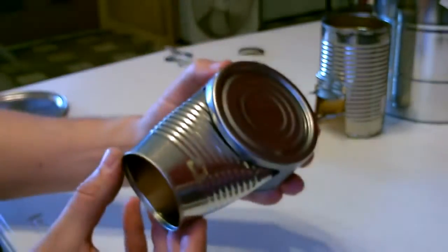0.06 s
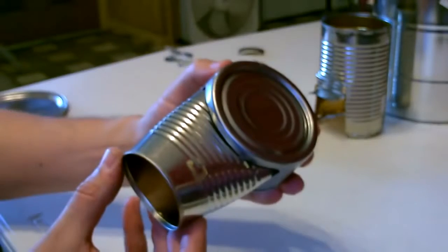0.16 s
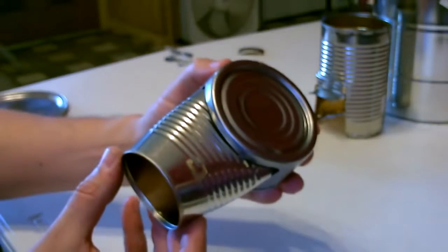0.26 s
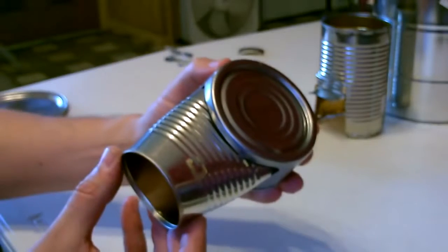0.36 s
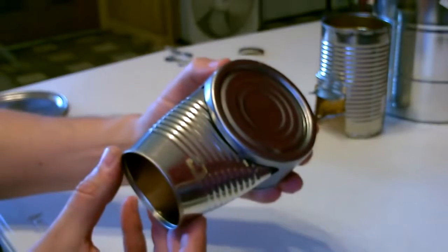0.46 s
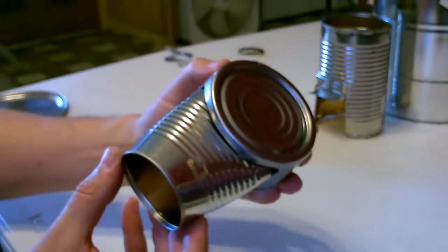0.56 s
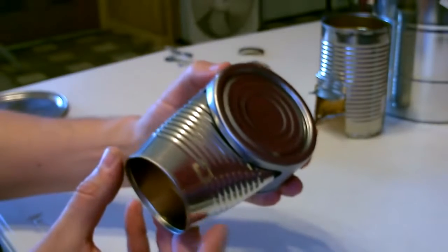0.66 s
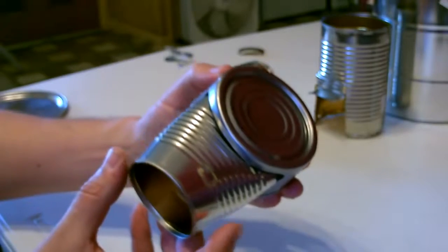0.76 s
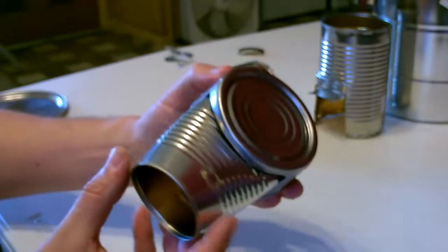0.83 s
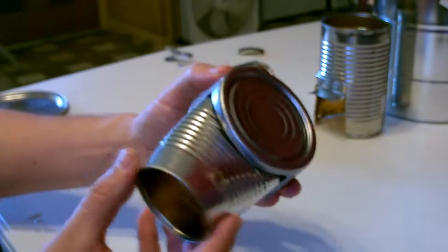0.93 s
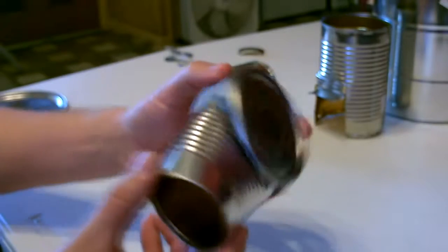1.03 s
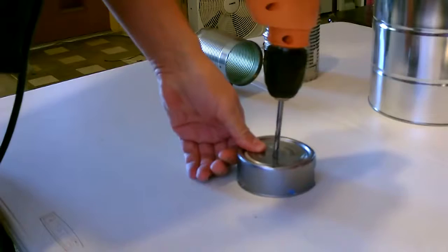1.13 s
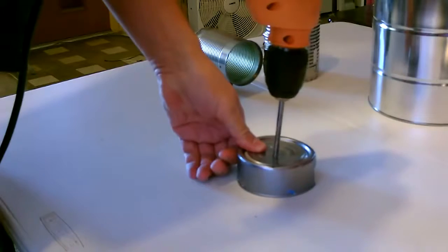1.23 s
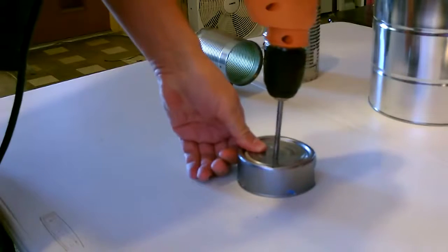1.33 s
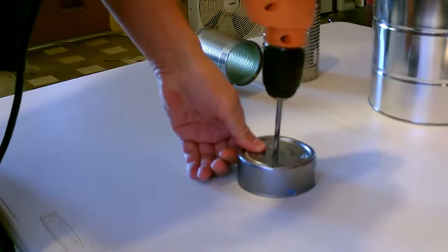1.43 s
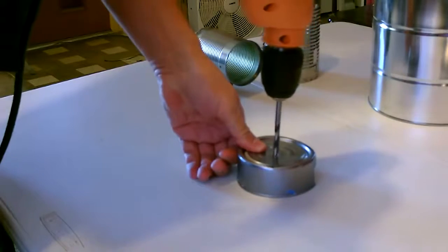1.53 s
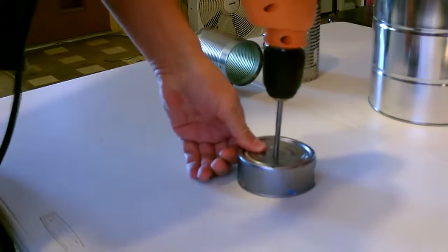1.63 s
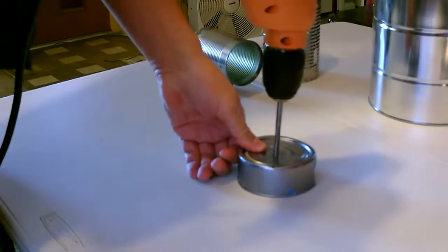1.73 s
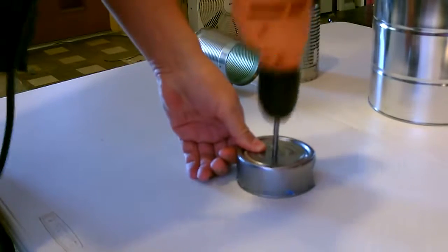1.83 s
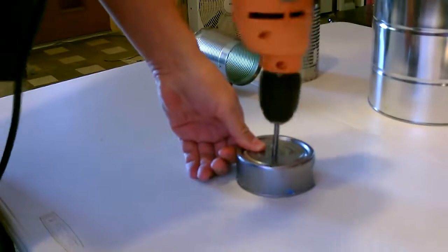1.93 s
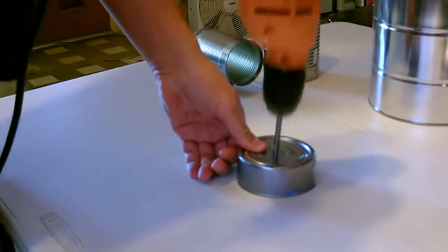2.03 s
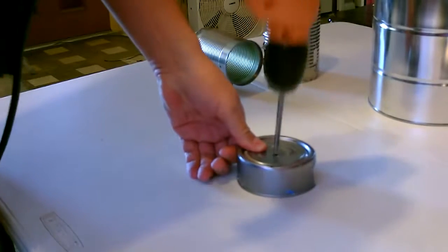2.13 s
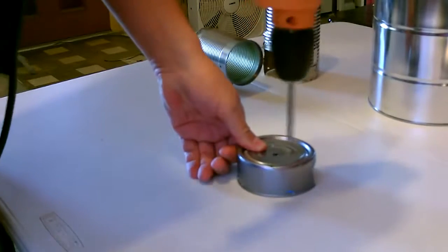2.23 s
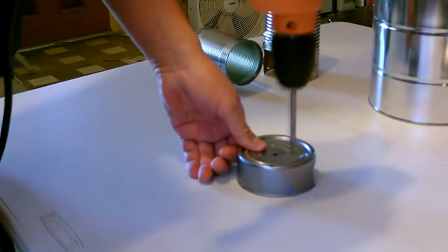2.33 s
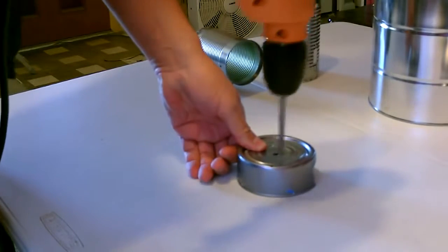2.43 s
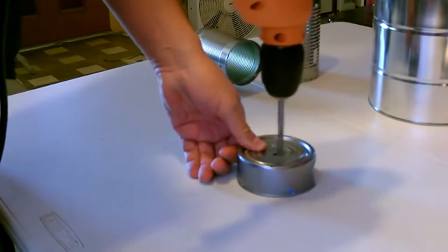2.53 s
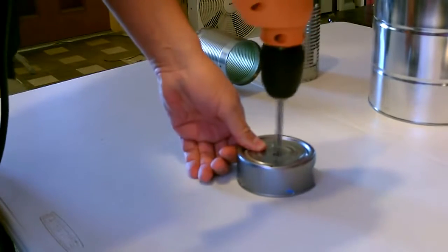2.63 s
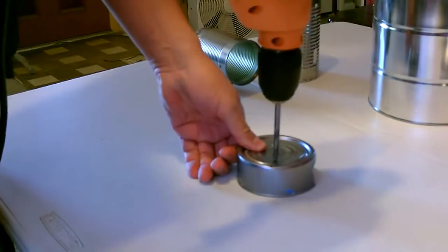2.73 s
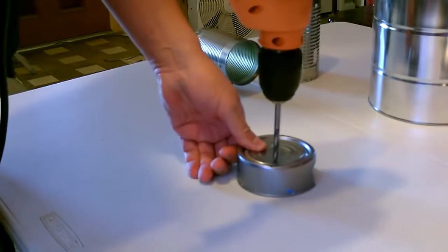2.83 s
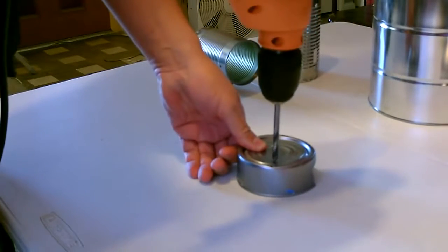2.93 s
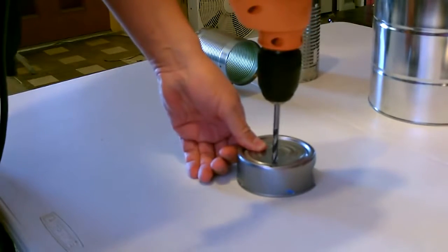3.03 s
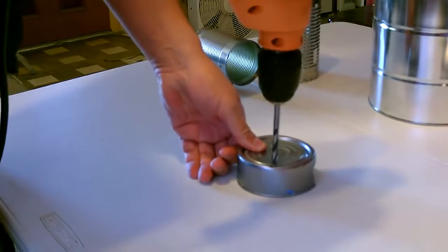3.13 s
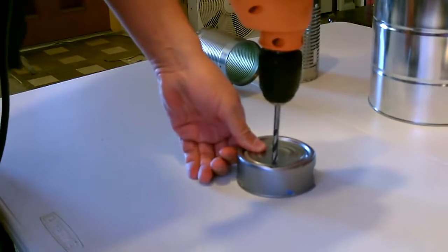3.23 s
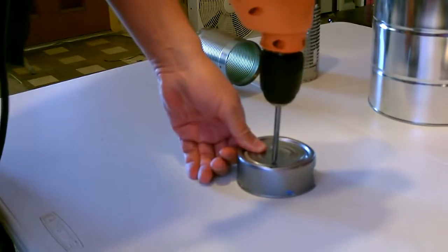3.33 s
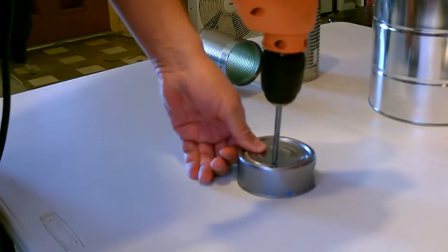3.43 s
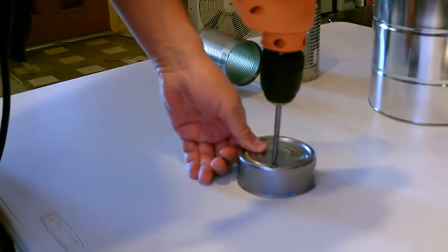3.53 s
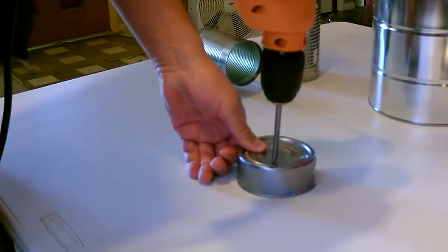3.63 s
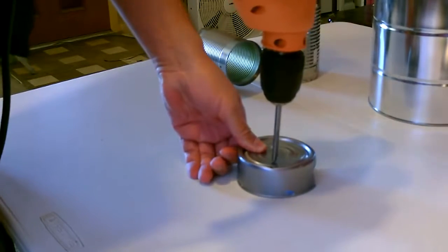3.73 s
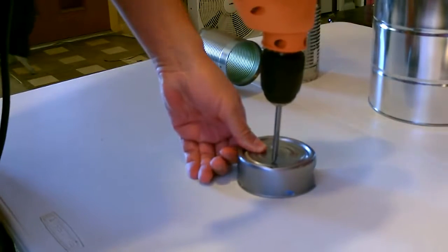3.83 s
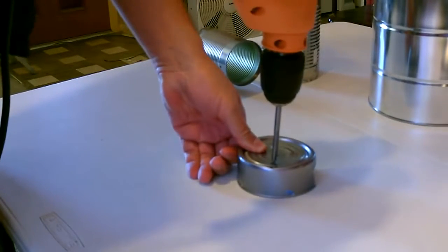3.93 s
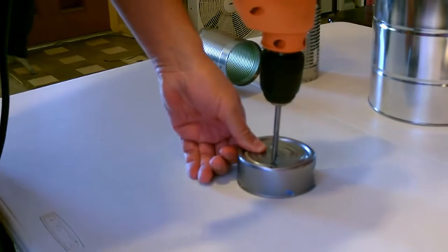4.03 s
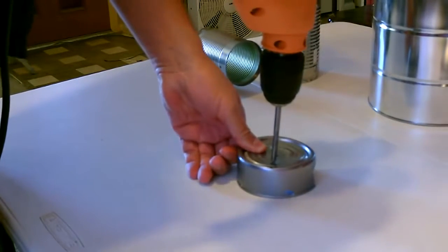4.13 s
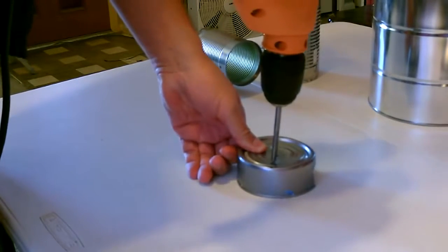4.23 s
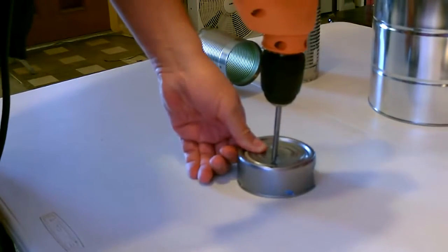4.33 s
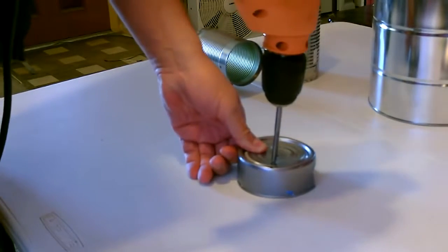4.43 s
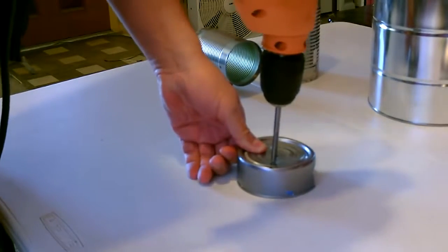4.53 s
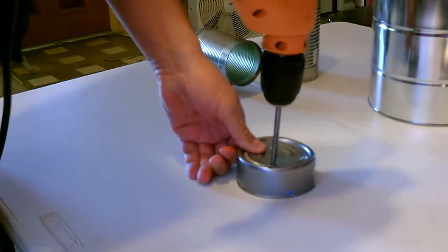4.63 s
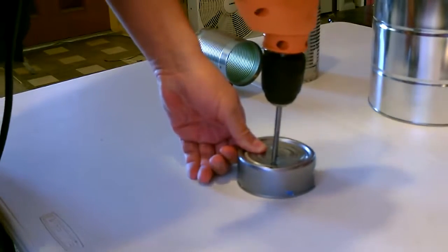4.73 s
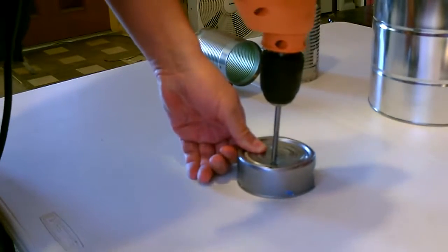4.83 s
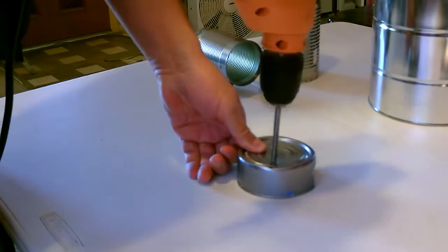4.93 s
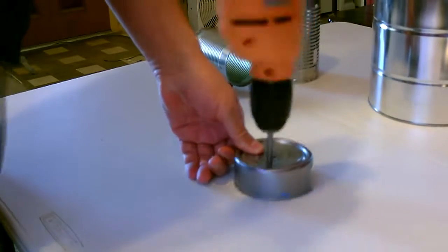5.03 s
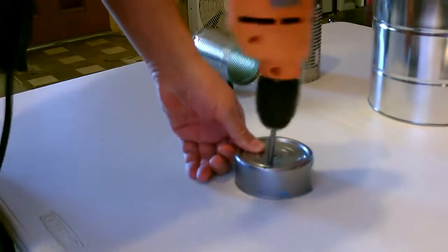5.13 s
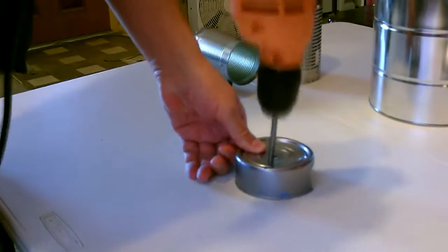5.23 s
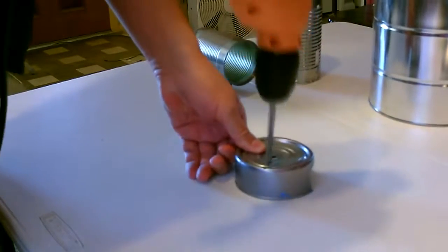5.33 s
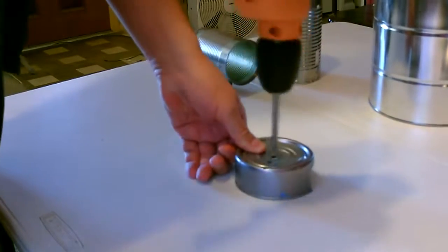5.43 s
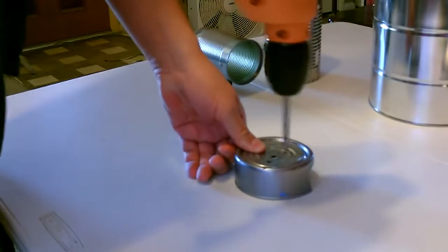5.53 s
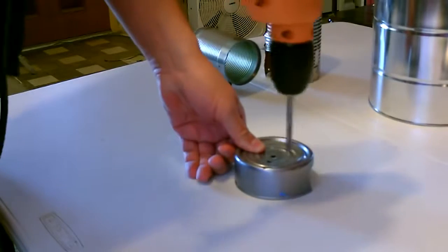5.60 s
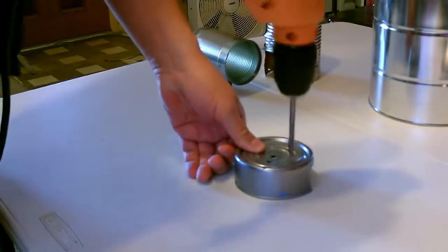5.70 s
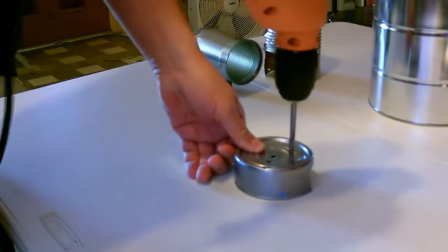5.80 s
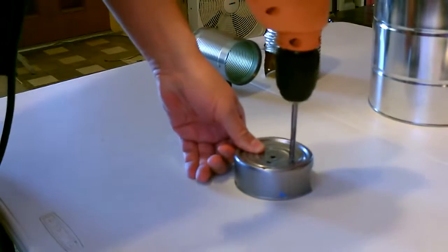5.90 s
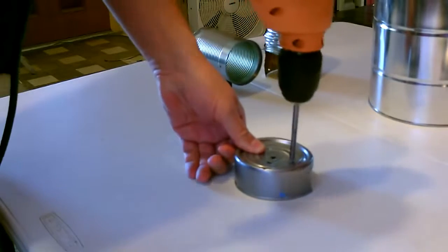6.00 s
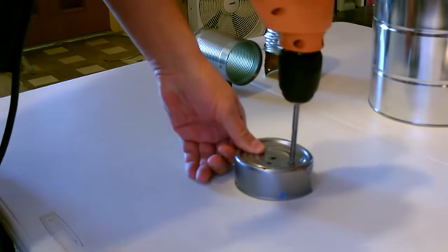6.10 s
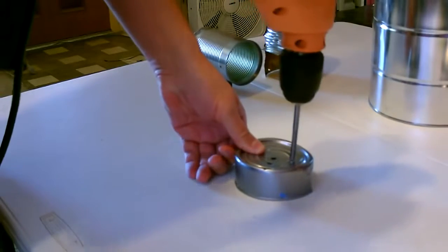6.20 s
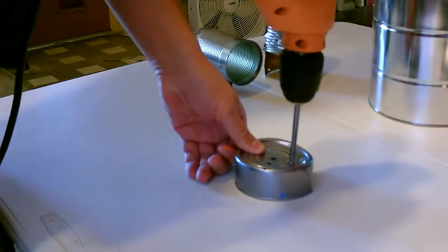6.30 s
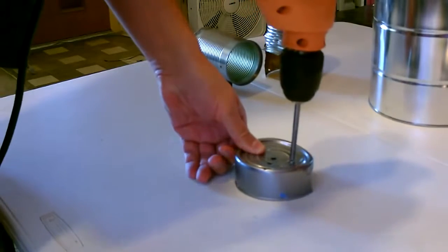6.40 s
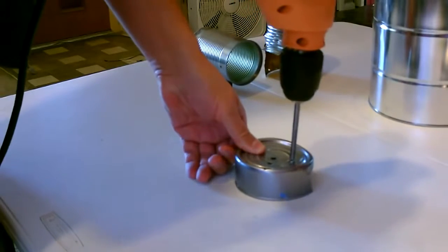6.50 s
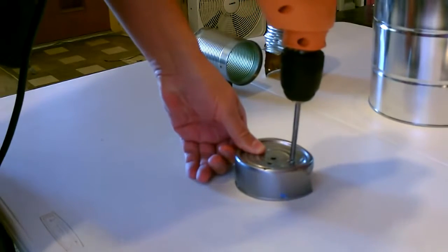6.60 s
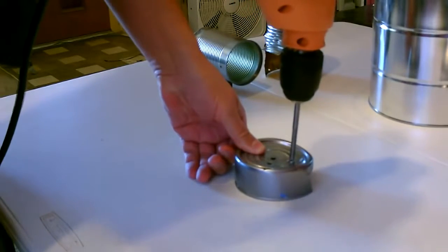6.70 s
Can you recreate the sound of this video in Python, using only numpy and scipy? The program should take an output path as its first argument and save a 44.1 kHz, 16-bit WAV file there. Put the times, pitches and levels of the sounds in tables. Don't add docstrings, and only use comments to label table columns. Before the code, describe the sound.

A mains drill works on a small tin can on a table, heard close in a lightly echoing room with a soft fan behind. Clicks of the trigger precede rough, throbbing bursts; short squeals rise as the motor speeds up. The bit catches, making the can drum and the lid sing with metallic clanks and low table thumps. Between bursts the whine sinks with rattling ticks, and the last burst is still grinding at the end.

```python
import sys
import numpy as np
from scipy import signal
from scipy.fft import rfft, irfft, next_fast_len
from scipy.io import wavfile
from scipy.ndimage import uniform_filter1d

SR = 44100
rng = np.random.default_rng(int(sys.argv[2]) if len(sys.argv) > 2 else 0)


def voltage_ratio(decibels):
    exponent = np.asarray(decibels, float) / 20
    return 10 ** exponent


def persist_wave(psi):
    counts = np.round(np.clip(psi, -1, 1) * 32767).astype(np.int16)
    wavfile.write(sys.argv[1], SR, np.atleast_2d(counts).T)


N = 298116
TIME = np.arange(N) / SR
MAINS_THROB_HZ = 122.1
HUM_HZ = 243
FIRST_PULL_S = 1.2755

# [f/Hz, width/Hz, level/dB]
HOUSING = [
    (2665, 130, 0),
    (2900, 320, -6),
    (3700, 260, -5),
    (4150, 350, -10),
]
# [f/Hz, width/Hz, level/dB]
GEARBOX = [
    (1790, 120, 0),
    (2100, 240, -3),
]
# [f/Hz, width/Hz, level/dB]
LID = [
    (964, 163, -0.5),
    (1256, 910, -1.5),
    (1520, 407, 1.5),
    (1650, 46, -8.5),
]
# [t/s, level/dB]
LOAD = [
    [(1.276, -37), (1.308, -41), (1.325, -32), (1.366, -29), (1.568, -35.5), (1.644, -43.5), (1.656, -39),
     (1.735, -56)],
    [(1.757, -45), (1.785, -28), (1.817, -28), (1.839, -26), (2.285, -36.5), (2.3, -59)],
    [(3.44, -62), (3.518, -35), (4.174, -43), (4.44, -35.5), (4.742, -38), (4.8, -36)],
    [(4.8, -36.5), (4.874, -31), (5.228, -26.5), (5.244, -34), (5.262, -30), (5.48, -29.5)],
    [(6.0, -52.5), (6.292, -37.5), (6.306, -44), (6.376, -30.5), (6.646, -33), (6.76, -33)],
    [(2.32, -42.5), (2.6, -54.5), (3.3, -67.5)],
    [(5.51, -40), (5.58, -58.5), (5.95, -65.5)],
]


def rms_one(x):
    return x / np.sqrt(np.mean(x ** 2) + 1e-20)


def in_time(rows):
    s, *columns = np.transpose(rows)
    return [np.interp(TIME, s, column) for column in columns]


def control(tables):
    return in_time(sorted(sum(tables, [])))[0]


def gate(start_s, end_s, fade_s):
    return np.clip(np.minimum(TIME - start_s, end_s - TIME) / fade_s, 0, 1)


def drift(rate):
    r = np.exp(-80 * np.pi * rate / SR)
    noise = rng.standard_normal(N // 40 + 2002)
    slow = signal.lfilter([1], [1, -2 * r, r * r], noise)[2000:]
    return np.interp(np.arange(N) / 40, np.arange(len(slow)), rms_one(slow))


def coloured(x, spectrum):
    hz, db = np.transpose(spectrum)
    grid = np.maximum(np.arange(N // 2 + 1) * SR / N, 1)
    return rms_one(irfft(rfft(x) * voltage_ratio(np.interp(np.log(grid), np.log(hz), db)), N))


def resonate(x, modes, sway_db=0):
    out = 0
    for k, (hz, width, db) in enumerate(modes):
        r = np.exp(-np.pi * width / SR)
        a = [1, -2 * r * np.cos(2 * np.pi * hz / SR), r * r]
        gain = voltage_ratio(db + sway_db * drift(17.7)) if sway_db else voltage_ratio(db)
        out = out + (-1) ** k * gain * signal.lfilter([(1 - r * r) / 2, 0, (r * r - 1) / 2], a, x)
    return rms_one(out)


def grit(per_s, spread_db, smooth):
    sizes = voltage_ratio(spread_db * np.minimum(rng.exponential(1, N), 4)) * rng.choice([-1, 1], N)
    contacts = sizes * (rng.random(N) < per_s / SR)
    return rms_one(contacts) + smooth * rng.standard_normal(N)


def add_ring(out, s, db, hz, t60, rise_s):
    start = round(s * SR)
    t = np.arange(min(4000, N - start)) / SR
    envelope = voltage_ratio(db - 60 * t / t60) * (1 - np.exp(-t / rise_s))
    out[start:][:len(t)] += envelope * np.sin(2 * np.pi * hz * t)


def cracks(events):
    spikes = np.zeros(N)
    for s, db in events:
        spikes[round(s * SR)] = voltage_ratio(db)
    envelope = signal.lfilter([1], [1, -voltage_ratio(-60 / (0.012 * SR))], spikes + 1e-18)
    spectrum = [(500, -47.0), (1200, -14), (3500, -0.5), (9000, -5.0), (16000, 1.5)]
    return envelope * coloured(rng.standard_normal(N), spectrum)


def throb(depth, sharp):
    firing_jitter_s = .0012
    t = TIME + 0.0017 + firing_jitter_s * drift(54)
    half_wave = np.abs(np.sin(np.pi * MAINS_THROB_HZ * t)) ** sharp
    depth = np.clip(depth, 0, 1)
    return 1 - depth + depth * rms_one(half_wave)


def phases():
    # [start t/s, throb depth 0-1, gearbox growl/dB, housing whirr/dB, lid ring/dB]
    work = [(1.2, 0.1, -2, -6, 2.5), (1.32, 0.1, 5.5, -1, 5), (1.58, 0, 6, -3, -4.5), (1.74, 0.27, 9, 2, 5),
            (1.91, 0.16, 10, 4, 9.5), (2.201, 0, -1, 7, 14.5), (2.295, 0.1, 5.5, -8, 6), (3.4, 1, 6, -1, 2),
            (3.79, 1, 7.5, -2.5, -2), (4.1, 0.3, 11, 3.5, -12), (4.3, 0.9, 1, 1, 0.5),
            (4.808, 0.8, -17, -2.5, 1), (4.91, .05, -1, -3, 9), (5.127, 0.3, 8.5, 3, 5.5),
            (5.51, 0, 7, -5, 13), (5.97, 1, 5, 0, -12), (6.352, 0.8, -6, 0, 2), (6.46, 0.7, 6, -8, 7)]
    start_s, *settings = np.transpose(work)
    current = np.maximum(np.searchsorted(start_s, TIME) - 1, 0)
    blend_s = .03
    return uniform_filter1d(np.array(settings)[:, current], size=round(blend_s * SR), axis=-1)


def fan():
    # [f/Hz, level/dB per Hz]
    air = [(18, -61), (40, -53.5), (102, -29.5), (177, -16), (266, -13), (300, -10), (497, -1.5),
           (574, -3.5), (632, -2.5), (1100, -16.5), (1430, -17), (2540, -27.5), (9290, -35), (13600, -38.5),
           (20400, -120)]
    hum = gate(1.15, np.inf, .05) * voltage_ratio(-61.5 + 2 * drift(12)) * np.sin(2 * np.pi * HUM_HZ * TIME)
    return voltage_ratio(-50.5 + .7 * drift(2.5)) * coloured(rng.standard_normal(N), air) + hum


def room(x):
    t60_s = 0.22
    size = next_fast_len(N + SR)
    w = 2 * np.pi * np.arange(size // 2 + 1) / size
    echoes = 0
    for lag in rng.uniform(.011, .037, 8) * SR:
        loop = voltage_ratio(-60 * lag / SR / t60_s * (0.5 + 0.58 * w)) * np.exp(-1j * w * lag)
        echoes = echoes + loop / (1 - loop)
    return irfft(rfft(x, size) * echoes, size)[:N]


def table_thumps():
    # [t/s, peak level/dB, f/Hz]
    jolts = [
        (1.11, -49, 140),
        (1.87, -54, 80),
        (2.041, -29, 140),
        (5.194, -29, 140),
        (5.488, -40, 60),
    ]
    out = np.zeros(N)
    for s, db, hz in jolts:
        add_ring(out, s, db + 3.5, hz, .05, .004)
    return out


def switch_clicks():
    # [t/s, peak level/dB]
    moves = [
        (1.0434, -52),
        (1.1594, -53),
        (1.2506, -17.5),
        (1.722, -17),
        (3.046, -50),
        (3.239, -45),
        (3.4298, -25),
        (6.117, -28),
    ]
    # [f/Hz, level/dB, time to die by 60 dB/s]
    parts = [
        (1390, -11, 0.01),
        (2300, -3, 0.0065),
        (3120, 0.5, 0.0043),
        (4370, -15, 0.073),
        (5400, -14, 0.031),
        (6660, 0.5, 0.011),
        (7160, -9.5, 0.0066),
    ]
    out = cracks([(s, db - 8.0) for s, db in moves])
    for s, db in moves:
        for hz, mode_db, t60 in parts:
            add_ring(out, s, db + mode_db - 9.0 + rng.normal(0, 1.2), hz, min(t60, .03), .0002)
    return out


def ticks():
    # [t/s, peak level/dB, f/Hz]
    first = [(1.2775, -22.5, 2050), (1.7635, -32, 2510), (1.7733, -29, 1740), (2.3527, -24, 2560),
             (2.378, -28, 3600), (2.41, -23, 2220), (2.449, -25, 3500), (2.394, -24, 3450),
             (2.425, -22.5, 4000), (2.4675, -45, 2410), (2.5127, -26.5, 2620), (2.542, -32, 1770),
             (2.588, -32, 3520), (2.6291, -24, 2100), (2.6634, -37, 3500), (2.691, -29, 3870),
             (2.722, -32, 1520), (2.7755, -36, 2060), (2.924, -32, 2420), (2.9567, -44, 3930),
             (2.83, -46, 2300), (2.8874, -41, 2000), (2.987, -41, 1980), (3.048, -32.5, 3600),
             (3.19, -52, 3730), (3.2381, -35, 2280)]
    later = [(3.4715, -35, 2030), (3.499, -21, 2160), (3.705, -24, 2180), (5.1143, -13, 2640),
             (5.1811, -10.5, 2600), (5.3548, -22, 2740), (5.4362, -17.5, 2850), (5.3338, -16, 2630),
             (5.4187, -14.5, 2900), (5.585, -31, 2550), (5.626, -35, 2500), (5.671, -27, 3720),
             (5.69, -29, 1900), (5.7313, -27, 2360), (5.7744, -30, 2560), (5.815, -36, 2520),
             (5.853, -52, 1500), (5.894, -36, 1400), (5.939, -28, 2690), (5.9565, -29, 2770),
             (5.981, -34, 1600), (6.02, -40, 1900), (6.13, -27, 2100), (6.198, -30, 2730),
             (6.228, -26, 2780), (6.2632, -27, 2700), (6.295, -30.5, 2050), (6.313, -27, 3700),
             (6.33, -31, 2300), (6.044, -44, 2640), (6.0627, -35, 2780), (6.095, -32, 2370),
             (6.118, -24, 2530), (6.1478, -25, 3560), (6.1648, -25, 1960), (6.182, -24, 2800),
             (6.2117, -30, 2600), (6.246, -21, 2850), (6.2814, -27, 2820), (6.3422, -19, 2590)]
    # [t/s, peak
    # level/dB, f/Hz]
    lid_answers = [(1.3179, -21, 1800), (1.3474, -17, 1790), (1.5269, -19, 1790), (1.5994, -28, 1800),
                   (2.4094, -29, 2200), (2.4723, -32, 1560), (2.5127, -33, 1910), (2.5396, -31, 1910),
                   (2.5875, -31, 2050), (2.6284, -28, 2180), (2.6894, -38, 2090), (2.7232, -30, 1900),
                   (2.7736, -37, 1930), (2.9846, -38, 2000), (5.688, -29, 1900), (5.7319, -33, 2190),
                   (5.7733, -29, 2050), (5.8516, -38, 1890), (5.9813, -35, 1510), (6.0132, -34, 1920),
                   (6.0616, -37, 1440), (6.094, -29, 2170)]
    chuck_answers = [(1.276, -29, 2880), (2.3526, -22, 3360), (2.3994, -28, 3230), (2.5122, -26, 2550),
                     (2.5411, -27, 3810), (2.588, -26, 3420), (2.6294, -30, 2300), (2.6648, -28, 3630),
                     (2.7222, -31, 3790), (2.7794, -34, 3310), (2.9294, -40, 2700), (3.5713, -11, 2430),
                     (5.4874, -12, 2970), (5.5194, -26, 2690), (5.5837, -29, 2550), (5.6261, -27, 2500),
                     (5.7319, -28, 2320), (5.7733, -29, 2450), (5.8142, -30, 3880), (5.9794, -34, 2570),
                     (6.0437, -31, 2670), (6.0626, -30, 2780), (6.117, -24, 2440)]
    out = cracks([(s, db - 8) for s, db, hz in first + later])
    for s, db, hz in first + later:
        add_ring(out, s, db - 0.5, hz, .013, .0002)
        for body_hz, width, mode_db in GEARBOX + HOUSING + LID[1:2]:
            body_db = db + mode_db - 6.5 + 1.5 * rng.normal(0, 1.9)
            add_ring(out, s, body_db, body_hz, .011, .0002)
    for s, db, hz in lid_answers + chuck_answers:
        add_ring(out, s, db + 1.5, hz, .016, .0002)
    return out


def snags():
    # [t/s, peak level/dB, f/Hz]
    catches = [(1.887, -4, 1640), (1.924, -11.5, 1520), (1.962, -7.5, 1280), (1.9652, -7, 1410),
               (1.997, -15, 1420), (2.021, -3.5, 1390), (2.233, -20, 1390), (2.266, -13.5, 1180),
               (2.283, -10, 1096), (2.832, -35, 1340), (2.89, -29, 1170), (2.137, -21, 1290),
               (2.148, -10, 1290), (2.207, -14, 1250), (5.128, -7, 1250), (5.1363, -5, 1360),
               (5.352, -13, 1470), (5.422, -7, 1400), (5.157, -10, 1360), (5.168, -4, 1210),
               (5.18, -18, 1230), (5.21, -5.5, 1420), (5.311, -10, 1274), (5.395, -4.5, 1187),
               (5.4153, -6.5, 1250), (5.457, -16, 1270), (5.488, 2.5, 1240), (5.937, -20.5, 1310)]
    out = cracks([(s, db - 23.5) for s, db, hz in catches])
    for s, db, hz in catches:
        add_ring(out, s, db, hz, .024, .0006)
        add_ring(out, s, db - 15.5, 2.3 * hz, .02, .0004)
        add_ring(out, s, db - 12.0, 0.747 * hz, .02, .0005)
    return out


def buzzing():
    # [t/s, length/s, multiple of the throb, level/dB]
    swells = [
        (2.62, 0.44, 2, -72),
        (4.998, 0.025, 3, -26.5),
        (5.269, 0.027, 2, -24.5),
        (6.133, 0.032, 2, -45),
        (6.253, 0.059, 3, -42.5),
        (6.396, 0.028, 3, -31.5),
        (6.695, 0.072, 2, -42),
    ]
    out = np.zeros(N)
    for s, length, k, db in swells:
        swell = voltage_ratio(db) * np.exp(-((TIME - s) / length) ** 2)
        out += swell * np.sin(2 * np.pi * round(k) * MAINS_THROB_HZ * TIME)
    return out


def panel():
    # [middle t/s, half length/s, f/Hz, level/dB]
    rings = [(1.281, 0.0083, 1800, -42), (1.342, 0.021, 2690, -34), (1.384, 0.064, 2210, -32),
             (1.408, 0.06, 1650, -42), (1.497, 0.1, 1690, -39), (1.818, 0.044, 1710, -26.5),
             (6.556, 0.067, 756, -34.5), (5.086, 0.027, 540, -26), (5.4, 0.048, 980, -29.5),
             (5.178, 0.023, 1004, -22.5), (1.932, 0.0097, 2860, -24), (1.983, 0.034, 2810, -24),
             (2.231, 0.015, 2780, -22), (2.263, 0.044, 3160, -30.5), (3.524, 0.03, 3400, -31),
             (3.593, 0.038, 3640, -30), (3.819, 0.018, 2800, -30.5), (3.898, 0.04, 2640, -33),
             (4.02, 0.084, 2640, -36), (4.363, 0.054, 2590, -33.5), (4.72, 0.11, 2630, -31),
             (1.894, 0.023, 1700, -28), (5.126, 0.014, 3690, -24), (5.18, 0.01, 2640, -17.5)]
    # [middle t/s, half length/s, f/Hz, width/Hz, level/dB]
    sparks = [
        (1.89, .07, 7430, 900, -29.5),
        (1.883, 0.085, 11600, 1200, -37),
        (1.945, 0.11, 15000, 900, -31),
        (4.95, .12, 12300, 1500, -34),
        (1.444, 0.15, 1800, 70, -36.5),
        (2.955, 0.23, 3850, 420, -53),
        (4.62, 0.091, 3600, 220, -37),
        (6.58, 0.25, 627, 60, -33),
        (5.3, 0.19, 1400, 40, -30),
        (3.663, .08, 3450, 250, -40),
    ]
    panel_width_hz = 142
    bursts = [(s, half, hz, panel_width_hz, db) for s, half, hz, db in rings] + sparks
    rattle = grit(1400, 2.5, 0.4) * throb(0.31, 2.2)
    out = np.zeros(N)
    for s, half, hz, width, db in bursts:
        reach = 2 * half + .02
        on = np.arange(round((s - reach) * SR), min(N, round((s + reach) * SR)))
        swell = voltage_ratio(db) * np.exp(-((on / SR - s) / half) ** 4)
        out[on] += swell * resonate(rattle[on], [(hz, width, 0)])
    return out


def cutting():
    # [f/Hz, width/Hz, level/dB]
    can = [
        (355.3, 76, -6),
        (555.7, 62, -0.5),
        (701, 55, -1),
        (787, 220, -8),
    ]
    # [f/Hz, width/Hz, level/dB]
    board = [
        (150, 60, -9),
        (243, 12, 0),
        (200, 80, -22),
    ]
    # [t/s, length/s, rise/dB]
    shudders = [
        (1.943, 0.012, 4),
        (2.045, 0.043, 11),
        (5.103, 0.13, 14),
        (5.235, 0.027, 12),
        (5.304, 0.037, 1),
        (5.44, 0.039, 8),
        (6.5, 0.35, -13),
        (5.75, .1, -8),
        (2.4, .1, -10),
    ]
    # [from t/s, to t/s, change/dB]
    gripped = [
        (2.13, 2.6, -2.5),
        (5.3, 5.6, -6.5),
        (3.6, 3.85, -3.5),
        (6.25, 6.85, -5),
    ]
    load_db = control(LOAD)
    lid_db = load_db + phases()[3] - 4.0
    drum_db = load_db - 0.3
    for start_s, end_s, db in gripped:
        drum_db = drum_db + db * gate(start_s, end_s, 0.071)
    table_db = load_db - 25.5
    for s, length, db in shudders:
        table_db = table_db + db * np.exp(-((TIME - s) / length) ** 2)
    bite = voltage_ratio(1.57 * drift(24))
    drum = resonate(grit(500, 2.0, 0.81), can, sway_db=2.5) * voltage_ratio(drum_db)
    lid = resonate(grit(700, 1.2, 1.0), LID) * voltage_ratio(lid_db)
    table = resonate(rng.standard_normal(N), board) * voltage_ratio(table_db)
    hum = voltage_ratio(table_db - 11 + 3 * drift(8)) * np.sin(2 * np.pi * HUM_HZ * TIME)
    return gate(FIRST_PULL_S, np.inf, .002) * (bite * (drum + lid) + table + hum)


def singing():
    # [t/s, level/dB]
    loudness = [
        [(1.93, -31), (1.97, -7), (2.1, -22.5), (2.202, -26), (2.236, -11.5), (2.285, -23), (2.3, -34),
         (2.33, -40)],
        [(5.08, -34), (5.158, -16.5), (5.34, -29), (5.4, -19), (5.45, -24), (5.49, -16), (5.54, -59),
         (5.66, -39)],
    ]
    # [f/Hz, width/Hz, level/dB]
    pierced = [
        (1187, 28, -7),
        (1288, 45, -7.5),
        (1402, 22, 1),
    ]
    rubbed = resonate(grit(400, 4.0, 0.37), pierced)
    level = sum(gate(rows[0][0], rows[-1][0], 0.048) * voltage_ratio(in_time(rows)[0] - 5.5) for rows in loudness)
    return rubbed * level


def coasting():
    # [start t/s, length/s, start f/Hz, level/dB, side line of the free chuck/dB, upper lines/dB]
    coasts = [
        (1.88, .17, 5620, -33, 0, 0),
        (2.03, .17, 4720, -41, 0, 0),
        (2.29, .81, 3957, -44, 1, -1),
        (3.68, .2, 4350, -41, -9, -6),
        (3.9, .38, 3270, -49, 1, 2),
        (5.5, .57, 3400, -47, -2, 1),
    ]
    # [multiple of the gear whine, level/dB, heard from f/Hz, heard up to f/Hz]
    lines = [
        (1, 1, 1700, 6000),
        (1.415, 2, 3000, 5400),
        (2, 4, 2850, 6700),
        (2, -13, 1700, 3000),
        (3, -5, 3300, 6200),
        (4, -10, 3400, 4700),
        (5, -9, 3700, 4900),
        (6.7, -12, 3700, 4500),
    ]
    # [f/Hz, level/dB]
    let_out = [
        (1850, -2),
        (2600, 0),
        (2950, -4),
        (3200, 0),
        (4000, 2),
        (4500, -1),
        (5000, -5),
        (5700, -6),
        (6600, -16),
    ]
    friction_hz_per_s, drag_per_s = 2880, .6
    lost_hz = friction_hz_per_s / drag_per_s
    through_hz, through_db = np.transpose(let_out)
    out = np.zeros(N)
    for s, length, start_hz, level_db, side_db, upper_db in coasts:
        on = slice(round(s * SR), round((s + length) * SR))
        t = np.clip(TIME - s, 0, length)[on]
        hz = (start_hz + lost_hz) * np.exp(-drag_per_s * t) - lost_hz
        fade = gate(s, s + length, .04)[on]
        phase = 2 * np.pi * np.cumsum(hz * (1 + .006 * drift(90)[on])) / SR
        for order, db, low_hz, high_hz in lines:
            line_hz = order * hz
            heard_db = level_db + db + side_db * (order == 1.415) + upper_db * (order >= 2)
            heard_db = heard_db + np.interp(line_hz, through_hz, through_db) + 2.2 * drift(110)[on]
            inside = np.clip(np.minimum(line_hz - low_hz, (high_hz - line_hz) / 2) / 250, 0, 1)
            out[on] += fade * inside * voltage_ratio(heard_db) * np.sin(order * phase)
    return out


def squeals():
    # [t/s, tooth rate f/Hz, level/dB, second harmonic level/dB]
    bursts = [
        [(1.815, 2018, -39, -62), (1.845, 2320, -21, -50), (1.872, 2585, -25, -25), (1.894, 2900, -40, -31),
         (1.92, 2900, -40, -60)],
        [(3.53, 1836, -45, -55), (3.546, 2030, -33, -49), (3.57, 2376, -28.5, -46.5), (3.63, 2470, -45, -51)],
        [(4.4, 1840, -26, -43), (4.42, 2095, -39, -39), (4.47, 2180, -38, -36)],
        [(4.815, 1993, -28, -53), (4.845, 2330, -29, -45), (4.87, 2585, -19, -21), (4.895, 2901, -27, -49),
         (4.92, 3000, -30, -50)],
        [(6.355, 1827, -48, -67), (6.38, 2130, -30, -52), (6.402, 2412, -20.5, -26), (6.435, 2760, -23.5, -21),
         (6.45, 2930, -28, -48), (6.475, 3140, -30, -55), (6.5, 3350, -32, -60), (6.53, 3520, -47, -60)],
    ]
    # [one pulse peaks at t/s, pulse rate f/Hz]
    pulses = [
        (1.849, 122),
        (3.5746, 112),
        (4.4406, 116),
        (4.85, 121.5),
        (6.4008, 120.5),
    ]
    out = np.zeros(N)
    for rows, (peak_s, per_s) in zip(bursts, pulses):
        hz, first_db, second_db = in_time(rows)
        pulse = 0.22 + np.abs(np.cos(np.pi * per_s * (TIME - peak_s))) ** 7.1
        phase = 2 * np.pi * np.cumsum(hz * (1 + .007 * drift(90))) / SR
        octave_heard = np.clip((5700 - 2 * hz) / 400, 0, 1)
        tone = voltage_ratio(first_db + 12.5) * np.sin(phase)
        octave = voltage_ratio(second_db + 2.5) * octave_heard * np.sin(2 * phase)
        out += gate(rows[0][0], rows[-1][0], 0.022) * pulse * (tone + octave)
    return out * voltage_ratio(2.0 * drift(49))


def motor():
    # [t/s, level/dB]
    speed = [
        [(1.276, -49), (1.305, -47.5), (1.382, -39.5), (1.526, -43), (1.715, -59.5)],
        [(1.755, -57), (1.775, -38.5), (1.861, -27.5), (1.95, -32.5), (2.033, -34.5), (2.2, -40), (2.25, -31.5),
         (2.3, -36)],
        [(2.3, -37.5), (2.906, -51.5), (3.258, -67), (3.3, -99)],
        [(3.44, -64.5), (3.542, -34.5), (4.038, -39.5), (4.3, -46.5)],
        [(4.3, -41), (4.308, -42), (4.4, -34.5), (4.8, -36.5)],
        [(4.8, -34.5), (4.878, -24), (5.438, -35.5), (5.48, -34)],
        [(5.5, -44), (6.11, -50), (6.33, -41.5), (6.39, -29.5), (6.45, -28), (6.76, -32)],
    ]
    # [f/Hz, level/dB per Hz]
    air = [
        (700, -22.5),
        (1500, -2),
        (2800, 4),
        (4300, -2.5),
        (7600, -6.5),
        (9300, -12),
        (12000, -13),
        (16000, -4),
    ]
    speed_db = control(speed)
    extra_load_db = control(LOAD) - speed_db
    depth, gearbox_db, housing_db, _ = phases()
    growl_db = gearbox_db + speed_db + 0.77 * extra_load_db - 10.5
    whirr_db = housing_db + speed_db + 0.71 * extra_load_db - 2.0
    rattle = grit(2500, 3.6, 0.3) * throb(depth, 2.9)
    growl = resonate(rattle, GEARBOX) * voltage_ratio(growl_db + 2.0 * drift(24))
    whirr = resonate(rattle, HOUSING, sway_db=3.5) * voltage_ratio(whirr_db + 2.7 * drift(24))
    hiss = coloured(grit(6000, 2.53, 0.56), air) * voltage_ratio(speed_db + 8.0 + 0.57 * drift(30))
    brushes = signal.sosfiltfilt(signal.butter(2, 3600, fs=SR, output="sos"), hiss)
    hiss = hiss + (voltage_ratio(0.77 * housing_db) - 1) * brushes
    return gate(FIRST_PULL_S, np.inf, .002) * (growl + whirr + hiss * throb(.3 * depth, 1.4))


def scene():
    knocks = switch_clicks() + ticks() + snags()
    running = motor() + cutting() + singing() + knocks + panel()
    no_rumble = signal.butter(2, 110, "high", fs=SR, output="sos")
    near = signal.sosfilt(no_rumble, running) + squeals() + coasting() + buzzing()
    heard = near + voltage_ratio(-16) * room(near) + fan() + table_thumps()
    return heard[None]


def thinned(x, share):
    hz, _, cells = signal.stft(x, SR, nperseg=1024)
    power = np.abs(cells) ** 2
    local = uniform_filter1d(uniform_filter1d(power, size=3, axis=-2), size=7, axis=-1)
    log_local = uniform_filter1d(np.log(local + 1e-20), size=41, axis=-2)
    around = np.exp(uniform_filter1d(log_local, size=5, axis=-1))
    limit = share * np.clip((hz - 3800) / 2200, 0, 1)[:, None] ** .5
    kept = cells * np.where(local < limit * around, .05, 1)
    return signal.istft(kept, SR, nperseg=1024)[1][..., :N]


def roll_off(x):
    return signal.sosfilt(signal.butter(12, 15720, fs=SR, output="sos"), x)


def record(dry):
    # [from f/Hz, level/dB]
    steps = [
        (9650, -28.5),
        (10450, -22),
        (13550, -59),
        (14500, -40),
    ]
    hz = np.arange(N // 2 + 1) * SR / N
    gain_db = np.zeros(N // 2 + 1)
    for from_hz, db in steps:
        gain_db[hz > from_hz] = db
    step_width_hz = 90
    gain_db = uniform_filter1d(gain_db, size=round(step_width_hz * N / SR))
    rounded = thinned(1.6 * np.tanh(dry / 1.6), .84)
    faded = rounded * gate(-1, N / SR, 0.0014)
    mix = irfft(rfft(faded) * voltage_ratio(gain_db), N)
    return roll_off(mix)


dry = scene()
out = record(dry)
persist_wave(out)
```